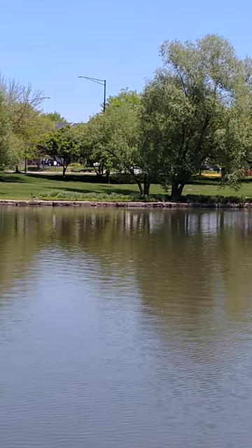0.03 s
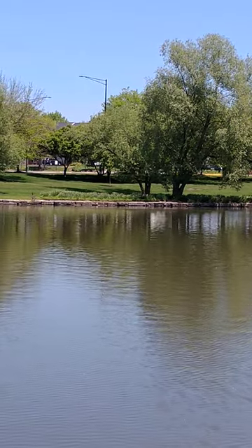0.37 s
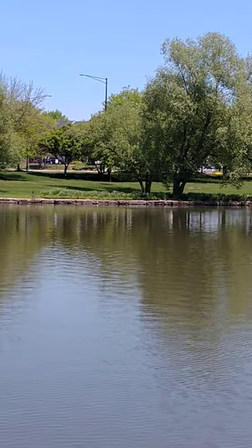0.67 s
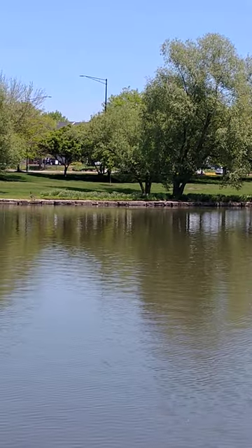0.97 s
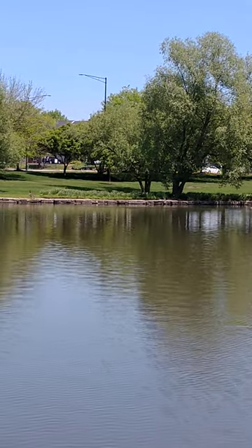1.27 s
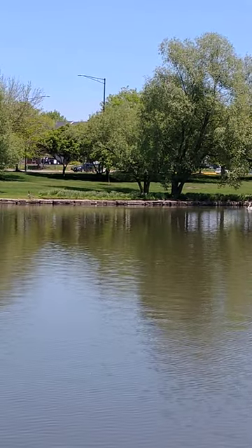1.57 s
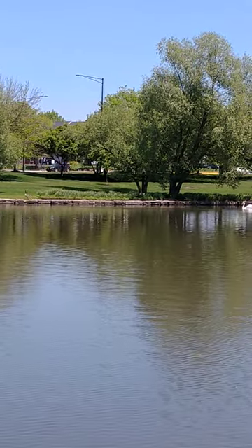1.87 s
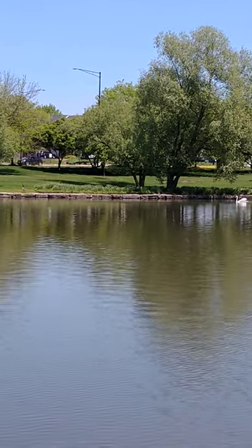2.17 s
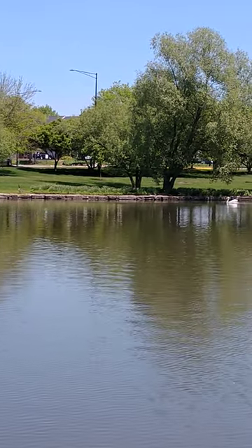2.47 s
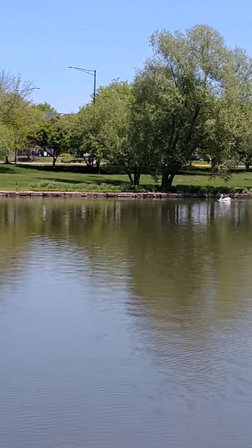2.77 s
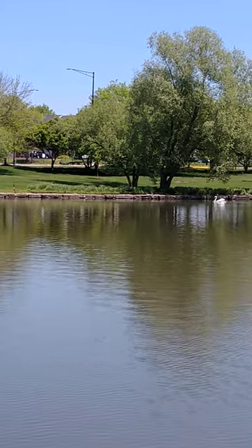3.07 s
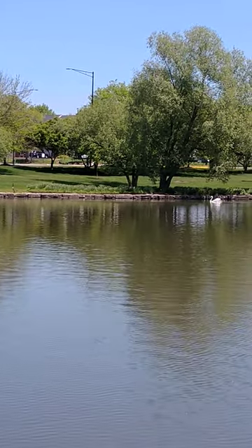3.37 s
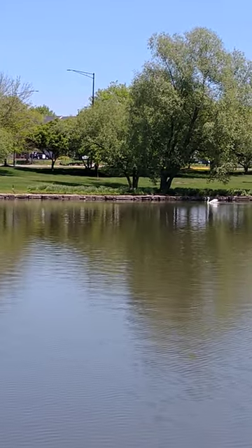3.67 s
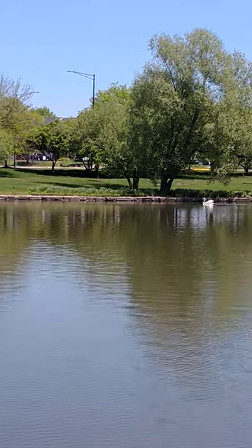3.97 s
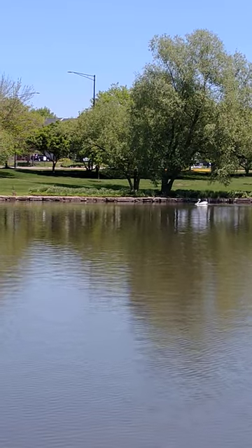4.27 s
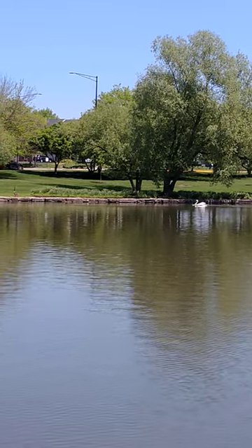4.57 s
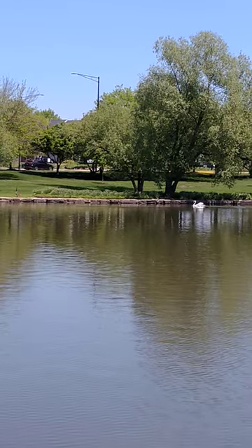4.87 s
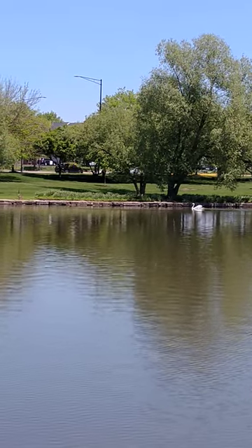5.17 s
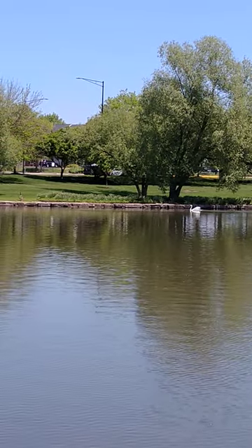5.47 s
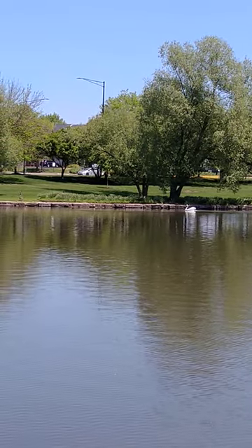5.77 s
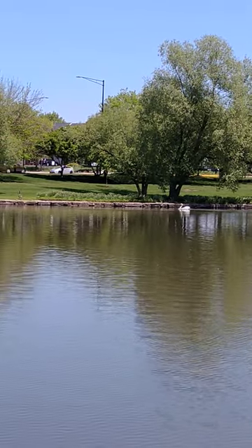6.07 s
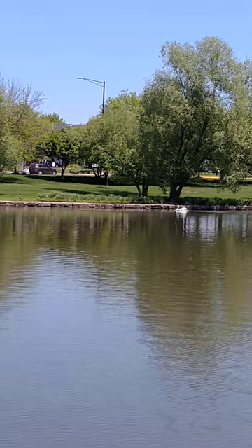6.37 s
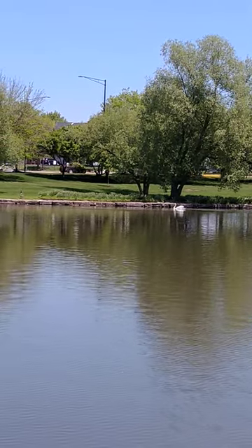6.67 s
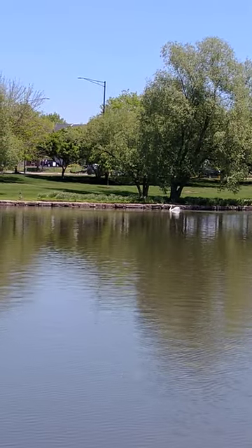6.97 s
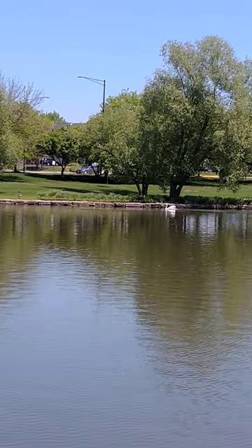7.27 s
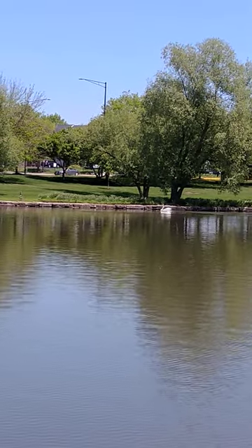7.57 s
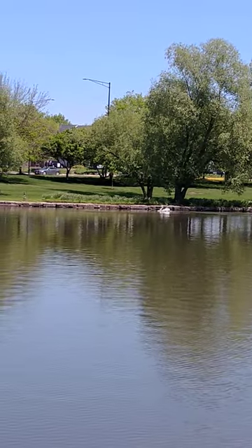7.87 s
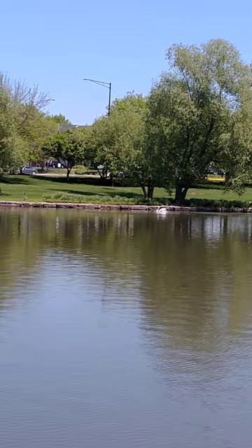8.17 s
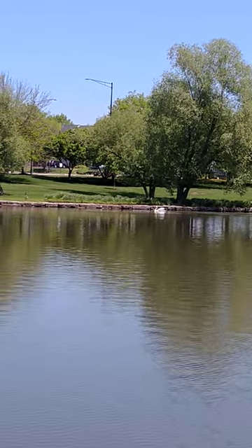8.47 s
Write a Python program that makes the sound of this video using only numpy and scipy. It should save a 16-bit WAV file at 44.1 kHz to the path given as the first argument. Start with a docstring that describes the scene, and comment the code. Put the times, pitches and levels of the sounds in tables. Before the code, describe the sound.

A low rumble of distant road traffic runs throughout, heard from a hand-held microphone beside a calm pond, with a very faint tyre hiss behind it. A low engine hum wavers in pitch and strength, swelling around 0.9, 3.5 and 4.7 seconds and dipping in pitch near 7. A second engine briefly climbs at about 5.4 seconds. The hand makes dull thuds, clearest at 0.3 and 2.9 seconds, softer at 1.4 and 4.7. Tiny, very high ticks are barely audible during the first three seconds. Small water plops sound softly near 0.7, around 3.5 and between 5.3 and 5.6 seconds, then in a clearer quick cluster at about 8.4. From roughly 3 seconds on, fingers make faint, high rustling strokes on the right, mostly around 5 and 6 seconds. A far bird peeps very faintly near 6.3 and 8 seconds.

```python
"""A calm pond in a park, heard from a hand-held phone.
Beyond the trees, engines rumble and tyres hiss, with low engine drones that rise and fall in pitch.
Ripples trap bubbles that plop at the bank, and a far bird peeps. The hand bumps the phone and
rustles on its case beside the right microphone. Faint, very high ticks sound at the phone."""
import sys
import numpy as np
from scipy import signal
from scipy.fft import rfft, irfft
from scipy.io import wavfile

SR = 44100
rng = np.random.default_rng(int(sys.argv[2]) if len(sys.argv) > 2 else 0)


def generate_wav(signal):
    """Clip the signal to [-1, 1] and save it as 16-bit WAV at the path in sys.argv[1]."""
    frames = np.transpose(np.atleast_2d(signal))
    scaled = np.clip(frames, -1, 1) * 32767
    pcm = np.round(scaled).astype(np.int16)
    wavfile.write(sys.argv[1], SR, pcm)


N = 384993
TIME_S = np.arange(N) / SR
FREQ_HZ = np.maximum(np.fft.rfftfreq(N, 1 / SR), 1)


def undb(db):
    """Turn decibels into a number to multiply a sound by."""
    return 10 ** (np.asarray(db) / 20)


def unit(x):
    """Scale a sound so its average strength (rms) is 1."""
    return x / np.sqrt(np.mean(x ** 2))


def over_time(rows):
    """Join a table's timed points with straight lines, one curve for each column after the time."""
    time_s, *columns = np.transpose(rows)
    return [np.interp(TIME_S, time_s, column) for column in columns]


def over_pitch(rows, column=1):
    """Fill in one column of a table for every frequency, giving each octave equal room."""
    rows = np.array(rows)
    return np.interp(np.log(FREQ_HZ), np.log(rows[:, 0]), rows[:, column])


def shape_tone(x, rows):
    """Turn each frequency up or down as a table says; the result has strength 1."""
    return unit(irfft(rfft(x) * undb(over_pitch(rows)), N))


def wander(rate_hz):
    """A smooth random wobble that changes about rate_hz times a second."""
    spectrum = rfft(rng.standard_normal(N)) * np.exp(-(FREQ_HZ / rate_hz) ** 2 / 2)
    spectrum[0] = 0
    return unit(irfft(spectrum, N))


def pan(db):
    """Left and right volumes: a positive pan_db is louder on the left, a negative one on the right."""
    return undb(np.array([[1], [-1]]) * db / 2)


def add(out, start_s, sound):
    """Mix a stereo sound in at its start time."""
    i = max(int(start_s * SR), 0)
    out[:, i:i + sound.shape[1]] += sound[:, :N - i]


# How loud the traffic rumble is: time_s, level_db
RUMBLE_LEVEL = [(0, -59.5), (0.9, -55), (1.55, -59.5), (2.2, -58), (2.9, -55), (4.1, -54), (5.3, -56.5),
                (6.15, -55), (6.6, -60.5), (7.5, -57.5), (8.15, -59.5), (8.73, -60)]
# The rumble's bass-heavy tone: frequency_hz, level_db
RUMBLE_TONE = [(15, -18), (28, -19), (45, -23), (62, -10), (78, 0.5), (95, -3), (120, 3), (148, -3.5),
               (175, -7.5), (215, -14), (255, -24.5), (290, -30.5), (450, -41.5), (900, -62.5)]


def traffic_rumble(gain_db=8.5, width_db=-14, pan_db=2.0, flutter_db=1.78):
    """Engines beyond the trees: only the bass carries, nearly alike at both microphones."""
    level_db, = over_time(RUMBLE_LEVEL)
    shared, side = shape_tone(rng.standard_normal((2, N)), RUMBLE_TONE)
    stereo = shared + undb(width_db) * np.array([side, -side])
    return stereo * pan(pan_db) * undb(level_db + gain_db + flutter_db * wander(14))


# The tone of far tyres and still air: frequency_hz, level_db
HISS_TONE = [(200, -31.5), (470, -6), (680, 1.5), (860, 0), (1100, 0.5), (1750, -4.5), (2150, -3),
             (2550, -12), (3300, -14), (4600, -17.5), (8000, -22.5), (15500, -29)]
# That hiss at the two microphones: frequency_hz, likeness (0 to 1), pan_db
HISS_STEREO = [(400, .85, 3.5), (724, 0.89, 1), (1100, .76, 0), (1720, 0.6, -1.5), (2040, 0.5, -6.5),
               (2800, 0, -.5), (5000, 0.16, -0.5), (14000, 0, -5)]


def tyre_hiss(level_db=-73, drift_db=0.5, flicker_db=0.64, busy_db=1.6, busiest_s=3.9, build_s=1.1):
    """Many far tyres: the middle range sways in the air and swells once as traffic thickens."""
    shared, side = rfft(rng.standard_normal((2, N)))
    likeness = over_pitch(HISS_STEREO)
    spectrum = np.sqrt(1 + likeness) * shared + np.sqrt(1 - likeness) * np.array([side, -side])
    spectrum = spectrum * pan(over_pitch(HISS_STEREO, column=2)) * undb(over_pitch(HISS_TONE))
    tyre_share = 1 / (1 + (FREQ_HZ / 2800) ** 4)
    tyres = irfft(spectrum * tyre_share, N)
    steady_air = irfft(spectrum * (1 - tyre_share), N)
    busy = np.exp(-((TIME_S - busiest_s) / build_s) ** 2)
    sway = undb(busy_db * busy + drift_db * wander(0.99) + flicker_db * wander(17))
    return undb(level_db) * unit(tyres * sway + steady_air)


# A far engine whose speed rises and falls: time_s, pitch_hz, level_db
FIRST_ENGINE = [(0, 121.7, -70), (.38, 127.3, -45), (.65, 137.7, -53), (.92, 128.4, -42),
                (1.25, 116.7, -55.5), (1.55, 123, -53), (1.8, 125.1, -46), (2.5, 125.6, -55.5),
                (3.0, 129, -48), (3.47, 131.7, -40), (3.85, 128.3, -42), (4.1, 119.3, -53.5),
                (4.55, 121.5, -48), (4.72, 124.5, -36.5), (5.05, 119.1, -44), (5.3, 111, -62.5),
                (6.2, 116.5, -47), (6.85, 91.85, -55), (7.55, 105.1, -47), (8.5, 127, -55),
                (8.67, 129.5, -42), (8.73, 130, -54.5)]


def engine_drone(rows, gain_db=-0.5, waver=0.015034, flutter_db=0.84, pan_db=2.0):
    """An engine hums one low, sliding note, its pitch and strength shaken by the breeze."""
    pitch_hz, level_db = over_time(rows)
    phase = 2 * np.pi * np.cumsum(pitch_hz * (1 + waver * wander(19.7))) / SR
    hum = unit(np.sin(phase) * undb(flutter_db * wander(13)))
    return hum * undb(level_db + gain_db) * pan(pan_db)


def burst(pitch_hz, width_hz, half_length_s):
    """Noise close to one pitch that swells for half_length_s, then fades for just as long."""
    size = 8192
    t = np.arange(size) / SR
    band = np.exp(-((np.fft.rfftfreq(size, 1 / SR) - pitch_hz) / width_hz) ** 2)
    noise = irfft(rfft(rng.standard_normal(size)) * band)
    sound = noise * np.sin(np.pi * np.minimum(t / (2 * half_length_s), 1)) ** 2
    return sound / np.abs(sound).max()


# Single tiny clicks at the phone: middle_s, pitch_hz, level_db, half_length_s
LONE_TICKS = [(0.05, 11000, -74, 0.022), (0.552, 11600, -69.5, 0.035), (3.017, 14300, -66, .022)]


def phone_ticks(gain_db=-7, width_hz=560, pan_db=-18, pair_db=-79, pair_hz=14700, pair_count=9):
    """Faint, very high, regular double ticks and a few lone clicks at the phone."""
    times_s = [.434 + .32 * k + gap_s for k in range(pair_count) for gap_s in (0, .025)]
    pairs = [(middle_s, pair_hz, pair_db + 2 * rng.standard_normal(), .012) for middle_s in times_s]
    out = np.zeros((2, N))
    for middle_s, pitch_hz, level_db, half_length_s in LONE_TICKS + pairs:
        tick = burst(pitch_hz, width_hz, half_length_s)
        add(out, middle_s - half_length_s, tick * undb(level_db + gain_db) * pan(pan_db))
    return out


def ring(pitch_hz, fade_s, rise_s, glide):
    """A note that starts softly and dies by 60 dB in fade_s, its pitch rising by the fraction glide."""
    t = np.arange(int(.25 * SR)) / SR
    phase = 2 * np.pi * np.cumsum(pitch_hz * (1 + glide * np.minimum(t / fade_s, 1))) / SR
    loudness = (1 - np.exp(-(t / rise_s) ** 2)) * np.exp(-np.log(1000) * t / fade_s)
    return np.sin(phase) * loudness / loudness.max()


# Bubbles at the bank: start_s, pitch_hz, level_db, fade_s, pan_db
BUBBLES = [(.156, 705, -65.5, 0.07, 10), (.668, 780, -58.5, 0.027, -6), (.785, 810, -57, 0.03, -6),
           (3.23, 1196, -67.5, 0.13, -13.5), (3.28, 1182, -70, 0.11, -19), (3.255, 460.8, -63.5, 0.048, 3),
           (3.48, 356.7, -60.5, 0.12, -1), (3.53, 347, -59.5, 0.087, 0), (3.574, 417, -63, 0.052, -2),
           (3.594, 1172, -66.5, 0.075, -18.5), (4.312, 1073, -60, 0.037, 18), (4.406, 721.2, -64, 0.045, 5),
           (5.178, 382, -63.5, 0.085, 0), (5.311, 643, -53.5, 0.049, 1), (5.593, 359.3, -47.5, 0.025, 4),
           (5.858, 400, -61, .08, -2), (8.338, 712, -41.5, 0.031, -1), (8.358, 769.5, -54.5, 0.1, -7),
           (8.421, 747, -57, 0.044, -8), (8.432, 720, -50.5, 0.048, -2), (8.464, 740, -53, 0.019, -17)]


def water_plops(gain_db=-1.0):
    """Ripples trap bubbles at the bank; each rings briefly, rising a little in pitch."""
    out = np.zeros((2, N))
    for start_s, pitch_hz, level_db, fade_s, pan_db in BUBBLES:
        plop = ring(pitch_hz, fade_s, rise_s=.005, glide=0.017)
        add(out, start_s, plop * undb(level_db + gain_db) * pan(pan_db))
    return out


# Soft knocks of the hand: start_s, pitch_hz, level_db
HAND_BUMPS = [(0.2764, 159, -29), (0.293, 245, -44.5), (1.356, 212, -42.5), (2.931, 120, -32.5),
              (3.051, 200.1, -41), (4.699, 220, -44)]


def hand_bumps(gain_db=-4.5, pan_db=-5):
    """Fingers nudge the phone: dull thuds that last only a few vibrations."""
    out = np.zeros((2, N))
    for start_s, pitch_hz, level_db in HAND_BUMPS:
        thud = ring(pitch_hz, fade_s=0.05, rise_s=0.0061, glide=0)
        add(out, start_s, thud * undb(level_db + gain_db) * pan(pan_db))
    return out


# A far bird's notes: middle_s, pitch_hz, level_db, half_length_s, pan_db
BIRD_NOTES = [(1.247, 4020, -82, 0.027, 8), (6.278, 2041, -71, .02, -18), (6.312, 2075, -68, .02, -16),
              (7.922, 2285, -78.5, .04, -14), (8.008, 2320, -78.5, 0.039, -16),
              (8.091, 2165, -68, 0.04, -23)]


def bird_peeps(gain_db=1.0, width_hz=70):
    """Short bird notes, blurred by their trip across the water."""
    out = np.zeros((2, N))
    for middle_s, pitch_hz, level_db, half_length_s, pan_db in BIRD_NOTES:
        peep = burst(pitch_hz, width_hz, half_length_s)
        add(out, middle_s - half_length_s, peep * undb(level_db + gain_db) * pan(pan_db))
    return out


def treble_glitter(spread_db=3.5, longest_s=0.06, glide=0.0023, count=7000):
    """Tiny high pips at random moments, pitches and strengths that make the rustle glitter."""
    when, pitch, span = rng.random((count, 3)).T[:, :, None]
    strength, bend = rng.standard_normal((count, 2)).T[:, :, None]
    t = np.arange(int(longest_s * SR)) / SR
    progress = np.minimum(t / (t[-1] * (1 + span) / 2), 1)  # 0 to 1 through each pip
    pitch_hz = 4500 + 9500 * pitch
    phase = 2 * np.pi * pitch_hz * t * (1 + glide * bend * progress)
    pips = np.sin(phase) * progress * (1 - progress) ** 2 * undb(spread_db * strength)
    positions = (when * N).astype(int) + np.arange(len(t))
    return unit(np.bincount(positions.ravel(), pips.ravel(), N)[:N])  # add each in at its place


# Four ranges where the rubbed phone case rings, lowest first: frequency_hz, level_db
CASE_LOW = [(4400, -26.5), (5600, -11.5), (6200, 0), (6700, -6), (7400, -34.5)]
CASE_MIDDLE = [(6800, -25), (7550, -14.5), (7920, -6), (8400, -4.5), (9000, -37)]
CASE_HIGH = [(8300, -26), (8850, -2.5), (9250, -6.5), (9850, 2), (10350, -6), (10750, -2), (11200, -18.5),
             (11700, -36)]
CASE_TOP = [(10800, -28), (11300, -2.5), (11650, 4.5), (12350, -1), (13000, -20.5), (13500, -38)]
# Finger strokes by the right microphone: middle_s, length_s, level_db, pitch_hz, width_hz
FINGER_STROKES = [(2.31, .22, -86, 11200, 1800), (3.149, .45, -85, 7900, 600),
                  (3.43, 0.31, -74, 10030, 2600), (3.65, 0.71, -85.5, 5870, 1100),
                  (4.05, 0.88, -81.5, 10350, 2000), (4.78, 0.28, -66, 11430, 1370),
                  (4.87, .38, -86, 6100, 700), (4.886, 0.57, -73, 7820, 750),
                  (5.09, 0.35, -71, 10800, 1700), (5.25, 0.72, -78, 10360, 200),
                  (5.9, 0.24, -67.5, 10100, 1350), (6.16, 0.31, -71, 10900, 1700),
                  (6.27, 0.084, -71.5, 12330, 300), (6.82, .22, -85, 8785, 1200),
                  (7.62, 0.43, -81.5, 10400, 2200), (7.83, 0.38, -84, 12230, 130),
                  (7.92, .27, -74, 9900, 2300), (8.19, .24, -82, 8802, 1700),
                  (8.636, .28, -77.5, 9890, 2600)]


def finger_rustle(hiss_db=-6, left_db=-29, resting_db=-91, touch_s=1.7):
    """Sliding skin makes the case ring; each stroke swells and fades around one pitch."""
    texture = treble_glitter() + undb(hiss_db) * rng.standard_normal(N)
    ranges = [(CASE_LOW, -1.5), (CASE_MIDDLE, -5), (CASE_HIGH, 0), (CASE_TOP, -4)]
    case = unit(sum(shape_tone(texture, tone) * undb(gain_db) for tone, gain_db in ranges))
    spectrum = rfft(case)
    out = case * np.clip(TIME_S - touch_s, 0, 1) * undb(resting_db)  # the resting finger creeps faintly
    for middle_s, length_s, level_db, pitch_hz, width_hz in FINGER_STROKES:
        pressure = np.exp(-np.abs(2 * (TIME_S - middle_s) / length_s) ** 2.4)  # a flattish bell shape
        band = np.exp(-((FREQ_HZ - pitch_hz) / width_hz) ** 2)
        stroke = unit(irfft(spectrum * band, N))
        out += stroke * pressure * undb(level_db)
    return out * undb([[left_db], [0]])


# Another engine on the road: time_s, pitch_hz, level_db
SECOND_ENGINE = [(5.15, 136, -80), (5.37, 141, -45.5), (5.6, 145.6, -55), (6.15, 161.8, -64),
                 (6.4, 166.8, -83)]


def second_engine():
    """A second engine is heard briefly, its hum climbing as it speeds up."""
    return engine_drone(SECOND_ENGINE)


def bank_echo(x, echo_db=-8, fade_s=0.3):
    """The bank and the water scatter sound into a short, soft echo."""
    t = np.arange(SR // 2) / SR
    tail = rng.standard_normal((2, len(t))) * np.exp(-np.log(1000) * t / fade_s)
    tail /= np.sqrt(np.sum(tail ** 2, axis=1, keepdims=True))
    return x + undb(echo_db) * signal.fftconvolve(x, tail, axes=1)[:, :N]


def from_left(x, delay_s=.00008):
    """Sound from the left reaches the right microphone a little later."""
    return np.array([x[0], np.interp(TIME_S - delay_s, TIME_S, x[1])])


def scene():
    """Far traffic, the pond, the ticks at the phone and the hand, added together."""
    engines = traffic_rumble() + engine_drone(FIRST_ENGINE) + second_engine()
    traffic = from_left(engines) + tyre_hiss()
    pond = bank_echo(water_plops() + bird_peeps())
    return traffic + pond + phone_ticks() + hand_bumps() + finger_rustle()


def record(dry, cutoff_hz=15600):
    """The phone cuts off the very highest treble."""
    treble_cut = signal.ellip(14, .2, 70, cutoff_hz, fs=SR, output="sos")
    return signal.sosfilt(treble_cut, dry)


dry = scene()
out = record(dry)
generate_wav(out)
```